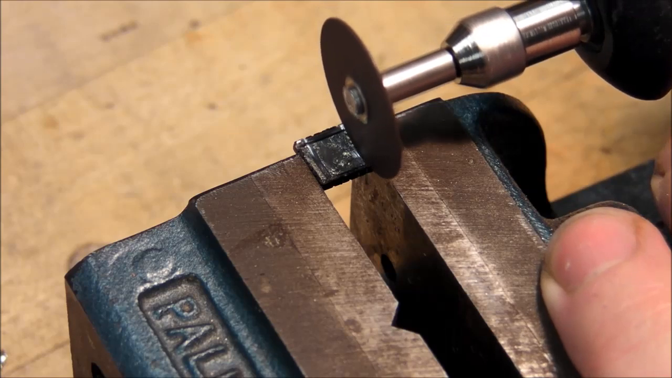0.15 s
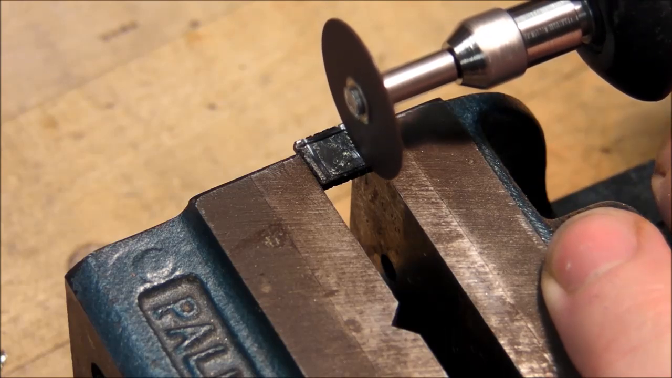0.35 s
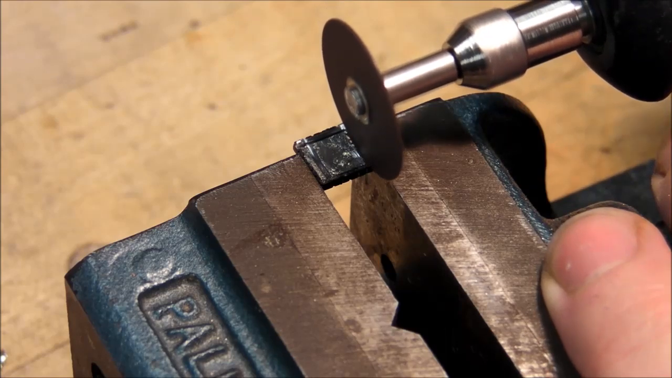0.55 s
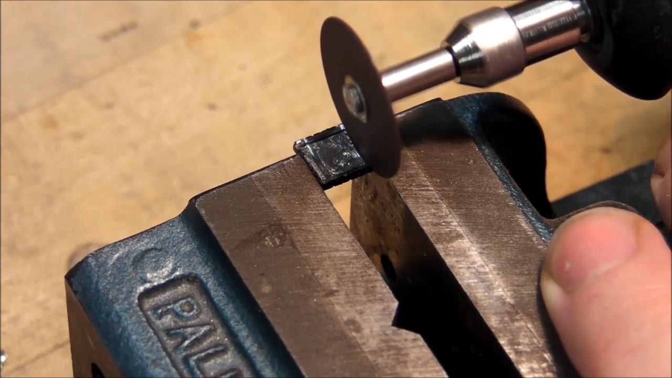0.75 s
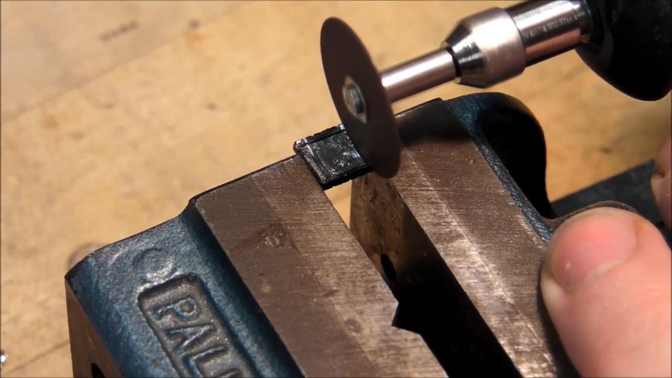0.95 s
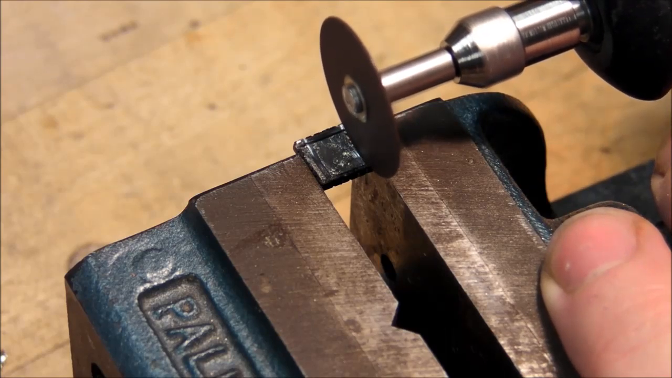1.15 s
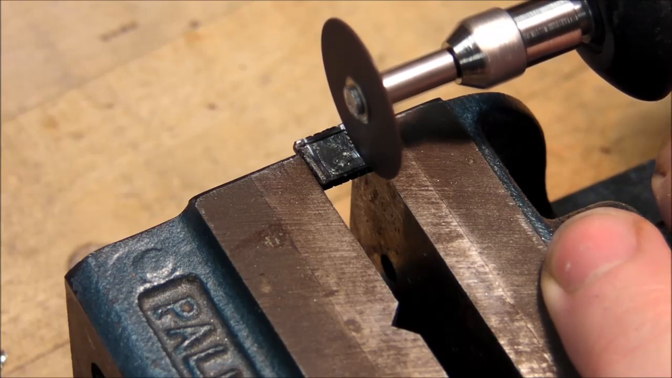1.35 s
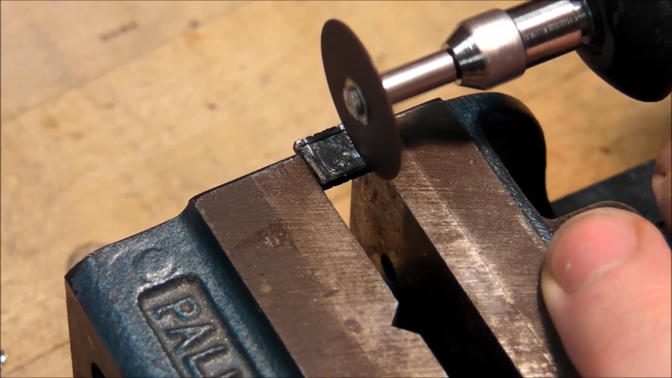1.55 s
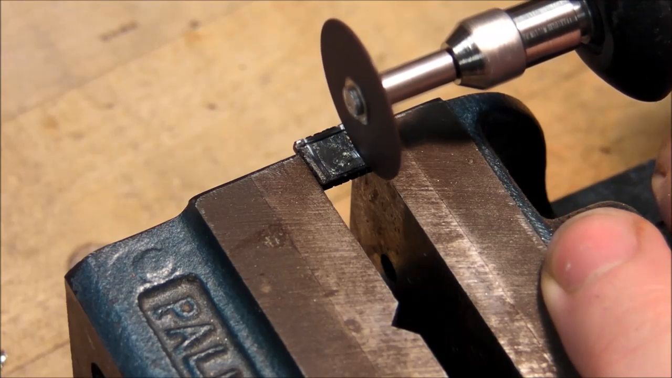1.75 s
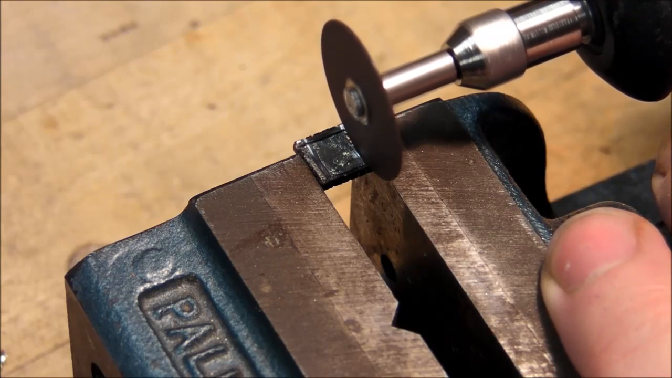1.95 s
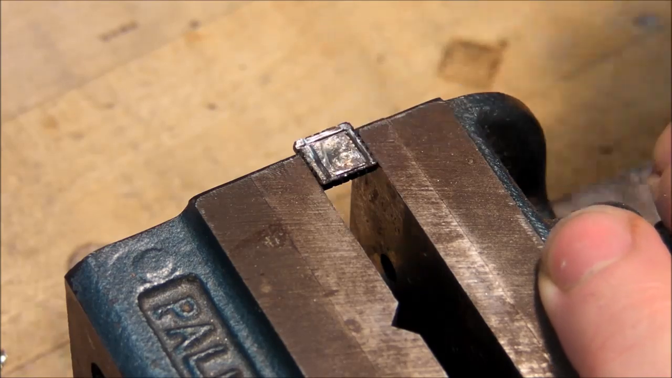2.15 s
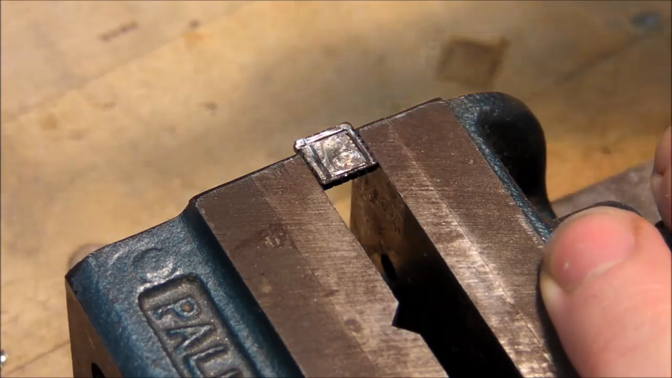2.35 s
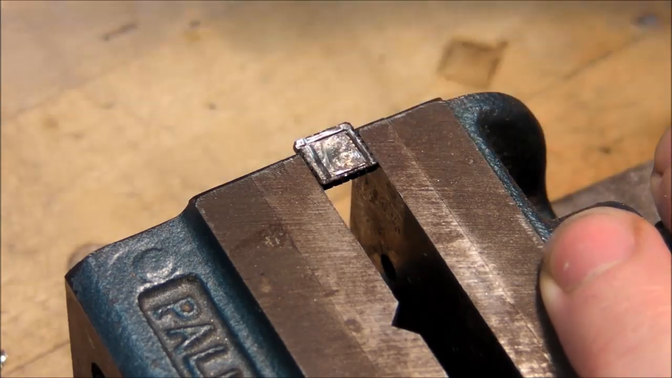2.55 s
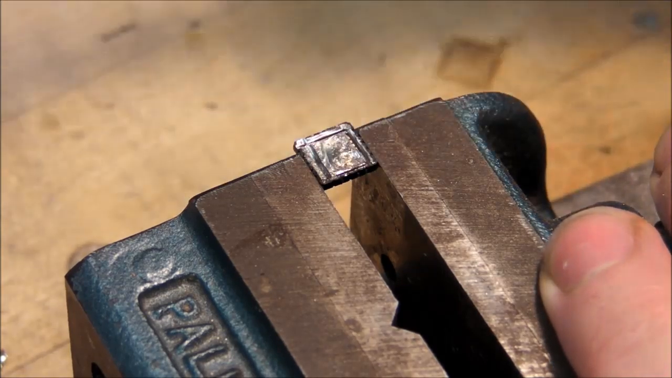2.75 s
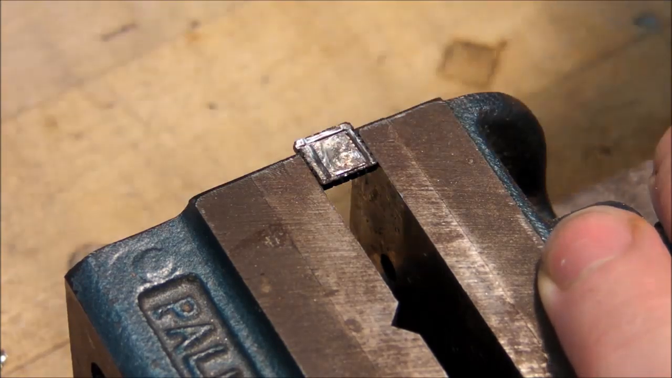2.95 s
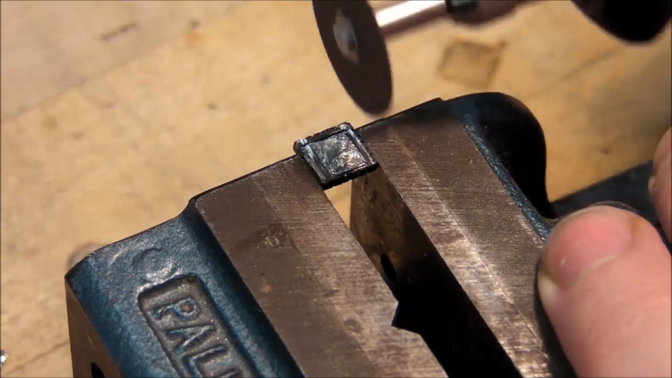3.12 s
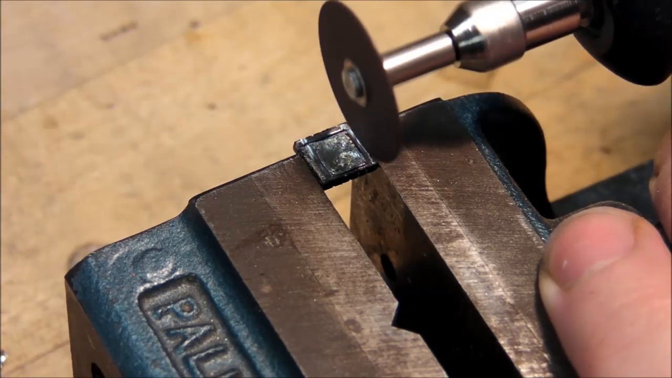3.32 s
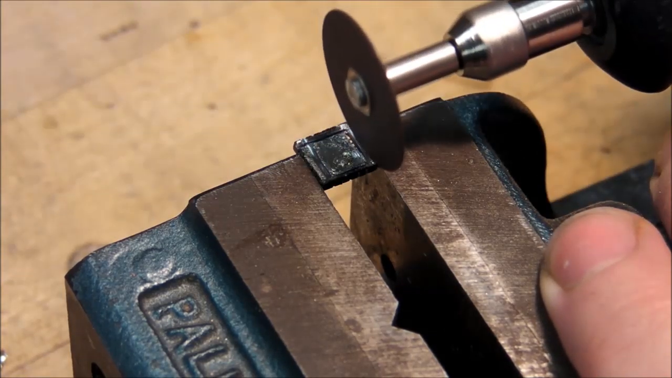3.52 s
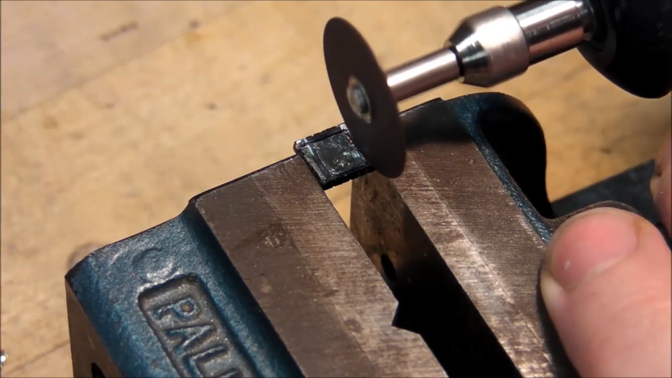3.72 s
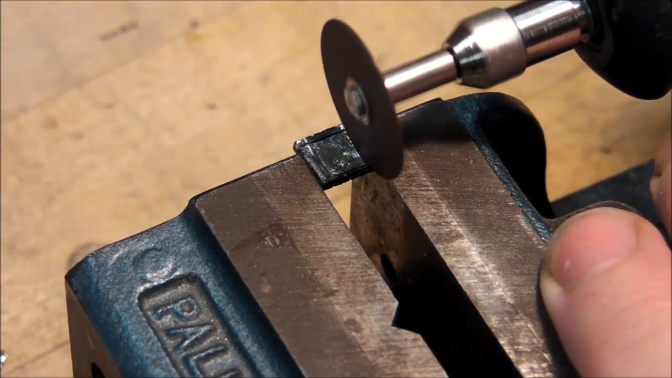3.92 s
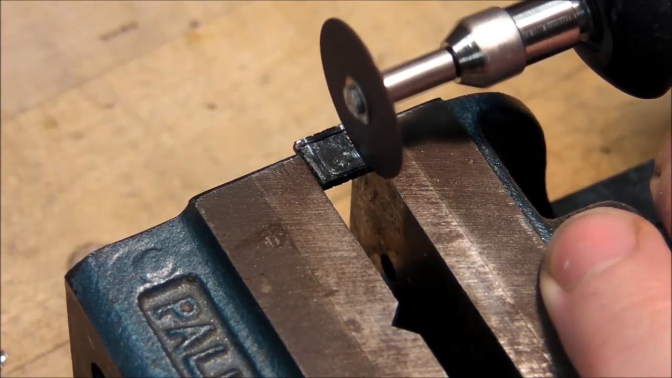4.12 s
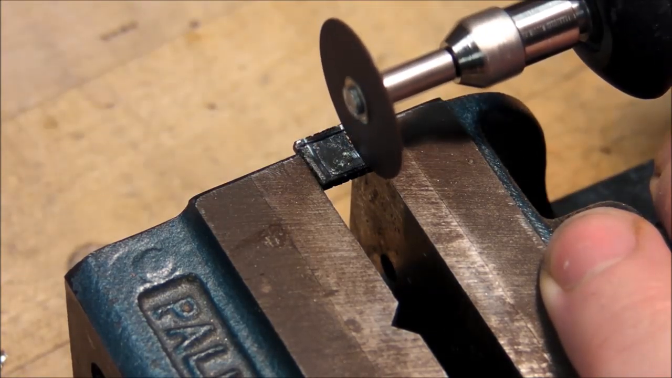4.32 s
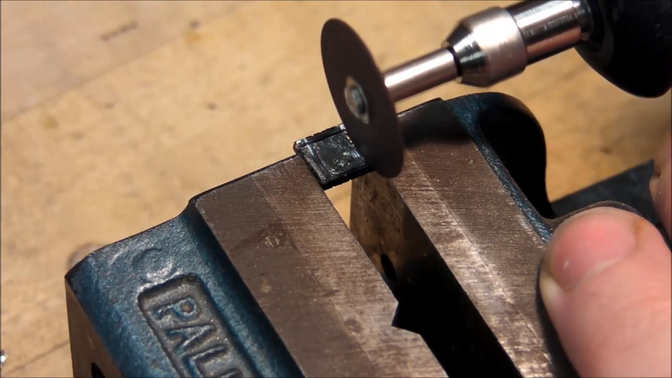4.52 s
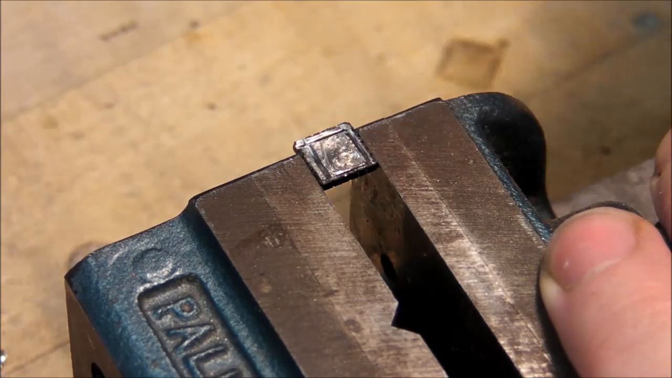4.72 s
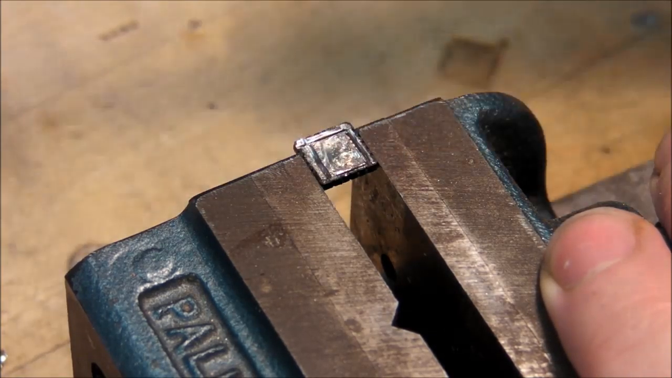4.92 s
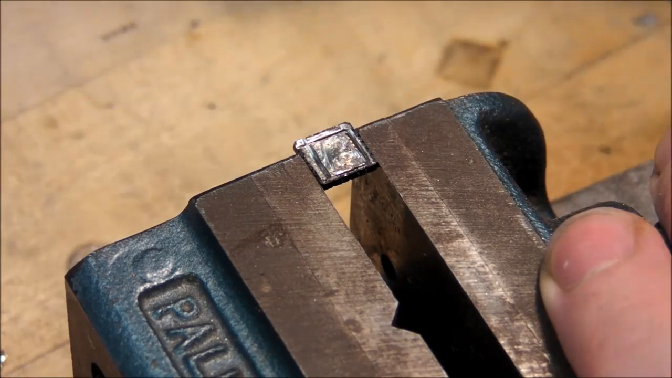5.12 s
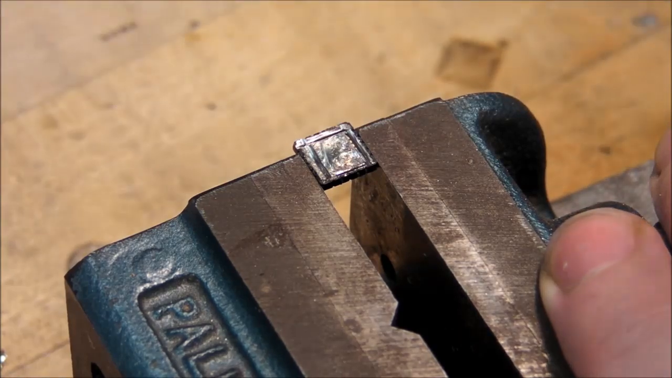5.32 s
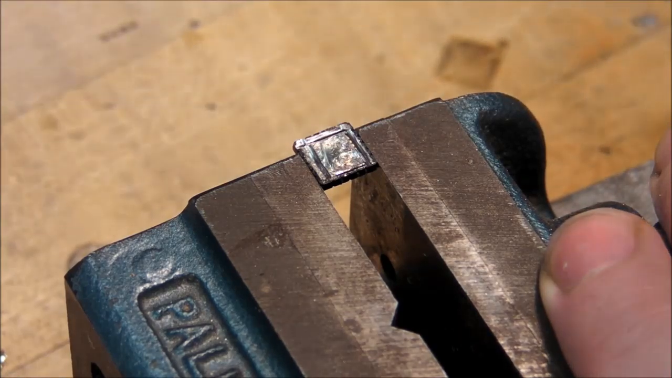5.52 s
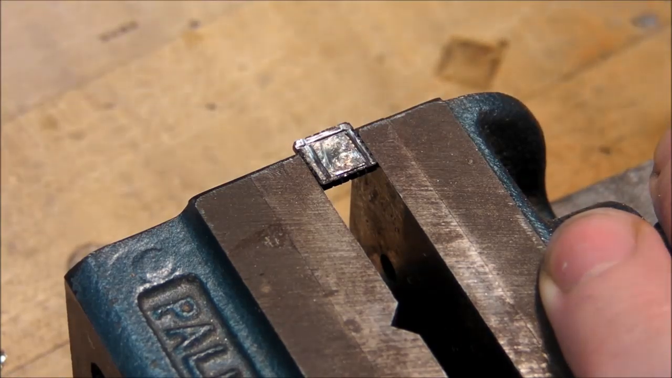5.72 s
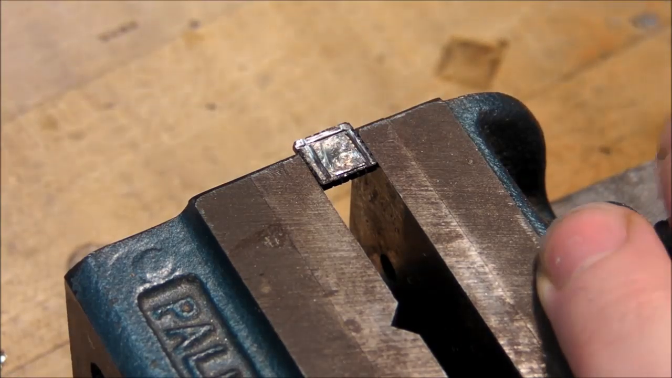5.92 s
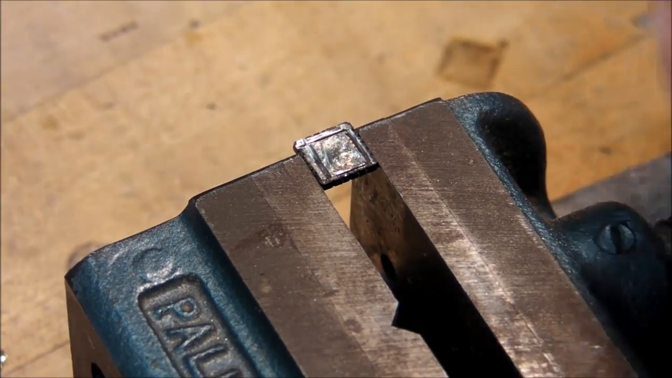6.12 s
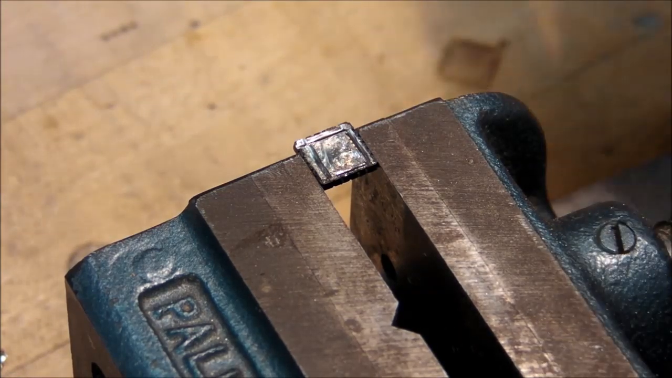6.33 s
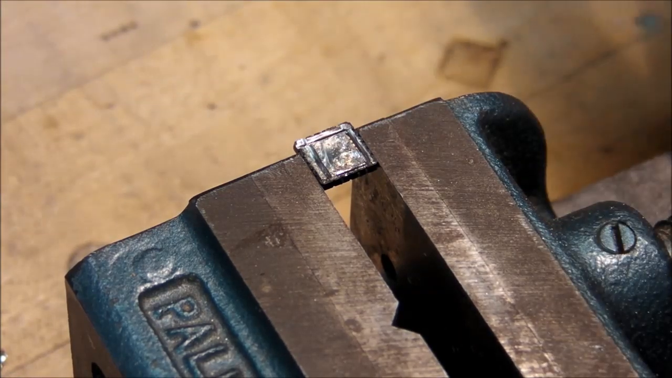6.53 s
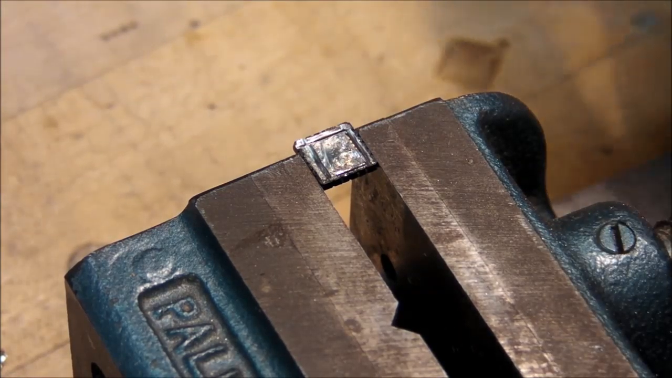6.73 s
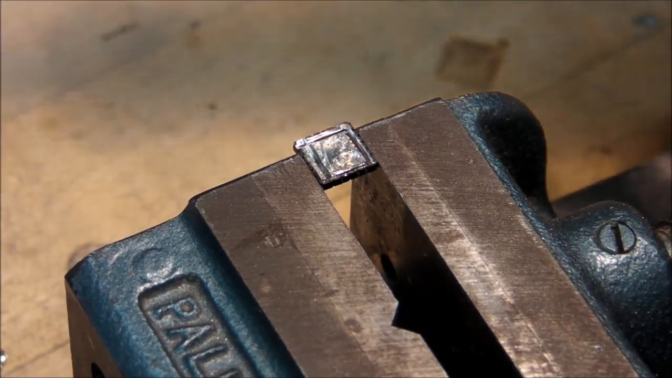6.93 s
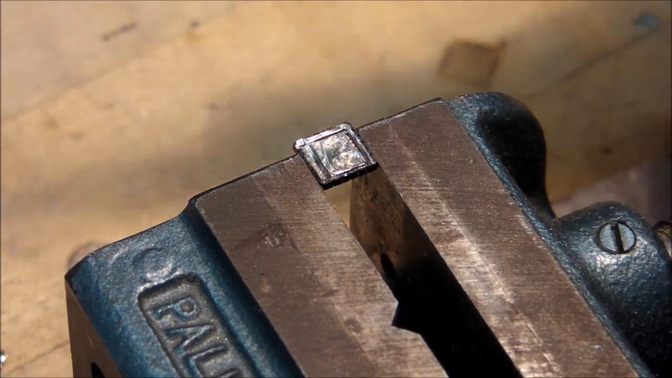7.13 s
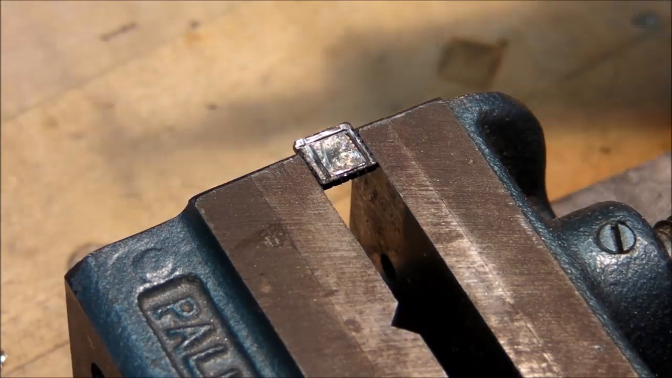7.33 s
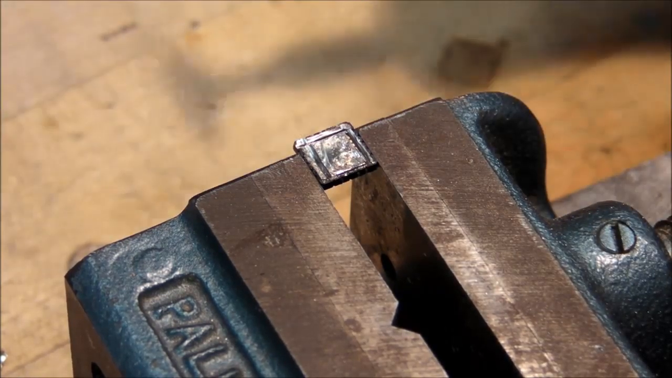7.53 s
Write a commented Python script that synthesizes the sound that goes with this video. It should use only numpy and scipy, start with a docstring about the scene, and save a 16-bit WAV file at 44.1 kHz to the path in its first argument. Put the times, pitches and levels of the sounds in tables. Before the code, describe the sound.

The sound starts mid-action, close up in a workshop with a short reflective tail. A small rotary tool whines, a dense buzzy tone with piercing whistles around 4 to 6 kHz, while its disc grinds a small part in a vise. Until about 2.1 s the grinding is rough and hissy, with harder bites near 0.3-0.8, 1.1-1.3, 1.6 and 2.0 s; the pitch sags slightly with a lag. From 2.1 to 3.9 s the disc is clear: the rasp drops and the cleaner whine climbs back. A second cut rasps from 3.9 to 4.6 s, dipping the pitch again. The tool then runs free, its tone shifting as it is lifted and turned. Faint handling rustle and soft low bumps near 6.2-6.35 s are almost buried. At 6.6 s power stops; the whine glides steadily downward, dulling and weakening, with airy bearing rattle until the end at about 7.6 s, still spinning.

```python
"""Workshop bench, close to the microphone: a small rotary tool with a cutting disc on a chip held in a vise.
The motor whines at up to 290 turns a second: a stack of orders of the shaft speed, coloured by the housing.
It sags with a lag under two cuts, where noise gated by the turning shaft rasps louder, and recovers when lifted.
Switched off, it coasts down, its bearings rattling strong and weak on alternate turns.
Behind it: reflections, room rumble, faint mains hum, rustle and soft bumps of handling."""
import sys
import numpy as np
from scipy import signal
from scipy.fft import rfft, irfft, next_fast_len
from scipy.io import wavfile
from scipy.ndimage import uniform_filter1d

SR = 44100
rng = np.random.default_rng(int(sys.argv[2]) if len(sys.argv) > 2 else 0)


def digitize_waveform(pressure):
    """Quantize a signal to 16-bit integers and store it at the path in sys.argv[1].

    Rows of a 2-D input are taken as channels; values are limited to [-1, 1].
    """
    field = np.atleast_2d(pressure).T
    bounded = np.clip(field, -1, 1)
    quanta = np.round(bounded * 32767).astype(np.int16)
    wavfile.write(sys.argv[1], SR, quanta)


N = 338247
T = np.arange(N) / SR
FRAME_S = .005
FRAMES = np.arange(0, N / SR + .01, FRAME_S)  # control times, s

# Shaft speed, in turns per s; friction is given as the speed at which air drag would equal it
FREE_HZ, LAG_S, START_SAG_HZ, OFF_S = 290.35, .71, 13.4, 6.603
DRAG_PER_S, FRICTION_HZ = .27, 403.1
RIPPLE_HZ, ROCKING_TURNS = 120, .0032  # twice the mains frequency
# Coasting, the shaft passes a speed at which it shudders
SHUDDER_HZ, SHUDDER_WIDTH_HZ, SHUDDER_DB = 238, 3, 3.2
SCATTER = .6  # of the orders' paths, free running
SECOND_ORDER_CUTOFF_HZ = 490
EDGE_HZ = 15750
BITE_EASE_S, CUT_EASE_S = .03, .02
# Tool drawn back between the cuts: start_s, end_s, move_s
PAUSE = (1.9, 3.3, 0.5)
# Tool lifted away after the work, then turned aside: start_s, end_s
LIFT, TURN = (4.65, 5.6), (5.8, 6.36)

# Disc in the cut, gains before each layer's share: start_s, end_s, hum_gain_db, rasp_gain_db
CUT_SPANS = [(-.04, 2.085, 5.5, 3.5), (3.915, 4.6, 1, 3)]
# Disc bites deeper and scrapes, gain before each layer's share: start_s, end_s, rasp_gain_db
BITE_SPANS = [(.3, .8, 0.7), (1.07, 1.33, 2.5), (1.58, 1.69, 3.5), (2.01, 2.075, 8), (4.03, 4.6, 5)]
# Pressing in each cut, as the speed the load would cost if held: time_s, load_turns_per_s
FIRST_CUT_LOAD = [(0.0, 15.5), (0.67, 17.3), (1.12, 41.3), (1.2, 48.9), (1.28, 35.1), (1.58, 28.8),
                  (1.69, 67.8), (1.91, 49.3), (2.06, 58.2)]
SECOND_CUT_LOAD = [(3.92, 5.9), (4.22, 18.5), (4.41, 39.1), (4.52, 13.0), (4.59, 27.1)]
# Housing's colour on the motor's lines, resonant near 4.1, 4.9 and 5.8 kHz: freq_hz, gain_db
HOUSING_COLOUR = [(270, -26.5), (780, -20.5), (950, 0.5), (1600, -4.5), (2300, -5.5), (2850, -18),
                  (3400, -5.5), (3850, -4.5), (4140, 3), (4500, 1), (4930, 4), (5200, 0.5), (5800, 1),
                  (7500, -12), (10300, -12), (12300, -59), (15500, -13.5)]
# Motor's lines below 3 kHz: free_db, speed_power, cut_share, load_db_per_turn_per_s, lifted_db, turned_db
HUM_LEVELS = {"first": (-62.5, 6, 0.43, 0.1281, -3.5, -0.5), "second": (-52.5, 1.5, -0.05, 0.22, 5.5, 1),
              "fourth": (-32, 1, 0.76, -0.1378, -13, 6), "fifth": (-35, 2.2, 1.67, 0, -4.5, 4.5),
              "sixth": (-34.5, 2.14, 1.72, -0.1221, -2.5, 1), "others": (-39.5, 0.5, 0.59, 0.11, -3, 4.5)}
# Treble of the orders, shifting as the tool is moved; WHINE_LEVELS adds: time_s, 3_to_5_khz_db, 5_to_7.5_khz_db
TREBLE_LEVELS = [(0.0, -19.5, -27), (0.1, -23.5, -21.5), (0.19, -18.5, -19.5), (0.63, -17.5, -23.5),
                 (1.27, -23, -17), (1.33, -25.5, -24), (1.78, -22, -18.5), (2.16, -36, -32),
                 (2.6, -29, -31.5), (2.79, -25.5, -31.5), (4.02, -24.5, -20.5), (4.89, -23.5, -30),
                 (5.08, -28, -23), (5.23, -27.5, -22.5), (6.05, -25, -23.5), (6.6, -33.5, -20),
                 (6.77, -32.5, -27.5), (7.6, -42.5, -34)]
# Offsets to the treble: free_db, db_per_rasp_db, coasting_db
WHINE_LEVELS = {"lower": (-5, -.15, -1.2), "upper": (-4.5, -0.55, -10)}
# The two whistles that ring loudest in the housing: time_s, order_16_db, order_20_db
WHISTLE_LEVELS = [(0.0, -28, -37), (0.36, -27, -37), (2.04, -37, -35), (2.64, -27.5, -40),
                  (2.76, -29, -25.5), (3.84, -29.5, -25), (4.32, -35, -38), (5.04, -27.5, -24.5),
                  (5.52, -28.5, -25), (5.76, -29, -53), (5.88, -24.5, -29.0), (6.24, -29.5, -57),
                  (6.48, -35, -29), (6.84, -42, -57), (6.96, -72, -47.0), (7.2, -82, -70)]
# Rasp of brushes, fan and disc: free_db, speed_power, cut_share, bite_share, pause_db, lifted_db, turned_db
RASP_LEVELS = {"body": (-37, 0.67, .5, 1.04, -2.5, -1.04, -2.5), "hiss": (-29.5, .7, 1, 0.87, -4, -1.3, -4),
               "fizz": (-34.5, 4, 1.18, -0.19, -1, -0.2, -4.5)}
# Relative colours of the rasp, the hiss with the power off, and the top spray: freq_hz, density_db_per_hz
BODY_COLOUR = [(150, -55), (260, -25), (370, -5), (560, -3.5), (760, -6.5), (1050, 2.5), (1600, 1.5),
               (2050, -4), (2400, 0), (2800, -9.5), (3300, -95)]
HISS_COLOUR = [(2300, -60), (2900, -19.5), (3400, -9.5), (4200, -1), (4900, 0), (5400, 1), (6300, 1.5),
               (6950, -9.5), (7500, -13), (8300, -47)]
COASTING_COLOUR = [(2600, -43), (3000, 9), (3400, -11), (4400, 5), (5200, -2), (6200, 12.5), (7100, 12.5),
                   (7900, 2), (8800, -6.5)]
FIZZ_COLOUR = [(6700, -27), (7500, 3), (8600, 4), (9500, 1), (10100, 3), (10900, 4.5), (11900, -4),
               (14000, -8), (15600, -16.5)]
SPRAY_COLOUR = [(11000, -30), (12500, 21), (14000, 20), (15600, -5)]
# Relative colour of the room rumble: freq_hz, density_db_per_hz
ROOM_COLOUR = [(15, -6), (55, 5.5), (130, 7.5), (240, 4), (600, -52), (4000, -64)]
# Soft bumps on the bench as the hand lets go of the vise: time_s, level_db, pitch_hz
BENCH_BUMPS = [(6.2, -50, 50), (6.35, -51, 60)]


def motor(turns, cut_scatter=0.97, fourth_db=2, rattle=0.049, spread_s=0.00063):
    """One knock a turn makes a stack of orders; reflections round the moving hand shift each of them."""
    order = np.arange(1, 61)[:, None]
    hz = order * speed(FRAMES)
    short_wave = np.minimum(hz / 4000, 1)  # long waves are less affected
    scatter = SCATTER + cut_scatter * contact(FRAMES)
    paths = 1 + short_wave * scatter * drift(2.9, count=len(order))
    # the housing spreads each knock in time: the middle of its range rings longest
    lag = np.exp(-2j * np.pi * spread_s * 1000 * np.tanh((hz - 5000) / 1000))
    # under power the low orders peak at unrelated angles
    powered = 1 - coasting(FRAMES, .6)
    lag = lag * np.exp(1j * np.pi * rng.uniform(-1, 1, order.shape) * (order < 11) * powered)
    # every fourth order stands out, as from a four-fold rotor
    lines = colour(HOUSING_COLOUR, hz) * paths * lag * amp(fourth_db * (order % 4 == 0))

    # split into four ranges, each held at its own level
    lower_db, upper_db = curves(TREBLE_LEVELS, FRAMES)
    levels_db = [hum_db("others") + shudder_db(FRAMES),
                 whine_db("lower", lower_db),
                 whine_db("upper", upper_db),
                 rasp_db("fizz")]
    above = [1] + [np.clip((hz - edge_hz) / 300 + .5, 0, 1) for edge_hz in (2900, 5100, 7500)] + [0]
    singing = np.array([1, 2, 4, 5, 6, 16, 20])
    gains = 0
    for k, db in enumerate(levels_db):
        part = lines * ~np.isin(order, singing) * (above[k] - above[k + 1])
        power = (abs(part) ** 2).sum(0)
        gains = gains + amp(db + 0.47 * coasting(FRAMES, 0.37)) * part / np.sqrt(power + 1e-4)

    # seven orders sing steadily; the low ones die as they sink below the housing's range
    low_db = [hum_db(name) for name in ("first", "second", "fourth", "fifth", "sixth")]
    steady = amp(low_db + curves(WHISTLE_LEVELS, FRAMES))
    gains[singing - 1] = steady * lag[singing - 1]
    # the small housing hardly radiates the second order once it is deep
    gains[1] *= np.minimum(hz[1] / SECOND_ORDER_CUTOFF_HZ, 1) ** 7
    gains[3:6] *= colour(HOUSING_COLOUR, hz[3:6])

    step, spin, stack = np.exp(2j * np.pi * turns), 1, 0
    for gain in gains:
        spin = spin * step  # next order's phasor
        stack = stack + np.sqrt(2) * (np.interp(T, FRAMES, gain) * spin).real
    # without drive the shaft rattles in its bearings, strong and weak on alternate turns
    return stack * (1 + rattle * coasting(T, 0.15) * np.cos(np.pi * turns))


def speed(t):
    """Turns per s: the rotor follows its load with a lag; switched off, air drag and dry friction slow it."""
    keep = np.exp(-FRAME_S / LAG_S)
    sag = signal.lfilter([1 - keep], [1, -keep], load(FRAMES), zi=[keep * START_SAG_HZ])[0]
    driven = FREE_HZ - np.interp(np.minimum(t, OFF_S), FRAMES, sag)
    decay = np.exp(-DRAG_PER_S * np.maximum(t - OFF_S, 0))
    return (driven + FRICTION_HZ) * decay - FRICTION_HZ


def load(t):
    """Braking of the disc in the cuts, in turns per s."""
    presses = (FIRST_CUT_LOAD, SECOND_CUT_LOAD)
    return sum(np.interp(t, *np.transpose(press), left=0, right=0) for press in presses)


def ripple():
    """The speed control feeds the motor in bursts, twice a mains cycle, until the switch-off."""
    phase = 2 * np.pi * RIPPLE_HZ * T
    return (1 - coasting(T, .02)) * (np.cos(phase) + 0.09 * np.cos(2 * phase))


def hum_db(name):
    """Level of a low line: in the cut the shaft also shakes the vise."""
    free_db, power, cut_share, per_load, lifted_db, turned_db = HUM_LEVELS[name]
    cut_db = cut_share * gains_in(CUT_SPANS, FRAMES)[0]
    return running_db(free_db, power, lifted_db, turned_db) + cut_db + per_load * load(FRAMES)


def whine_db(name, treble_db, fade_s=0.6, pause_db=1.2):
    """Level of a whine range: clean lines give way to rasp in the cut, and fade with the power off."""
    free_db, per_rasp, coast_db = WHINE_LEVELS[name]
    grinding_db = gains_in(CUT_SPANS, FRAMES)[1] + gains_in(BITE_SPANS, FRAMES, BITE_EASE_S)[0]
    moved_db = treble_db + free_db + pause_db * within(FRAMES, *PAUSE)
    return moved_db + per_rasp * grinding_db + coast_db * coasting(FRAMES, fade_s)


def shudder_db(t):
    """Swells while the falling speed crosses the shaft's resonance."""
    return SHUDDER_DB * np.exp(-((speed(t) - SHUDDER_HZ) / SHUDDER_WIDTH_HZ) ** 2)


def rasp(turns, free_gate=0.04, cut_gate=0.094, coast_gate=0.17, uneven_db=-1.0, cut_uneven_db=1.6, grit_db=1):
    """Rubbing noise swells once a turn; in the cut each turn bites differently and single grits tear out."""
    cut, coast = contact(T), coasting(T, 0.9)
    depth = free_gate + (cut_gate - free_gate) * cut + (coast_gate - free_gate) * coast
    gate = 1 + np.clip(depth, 0, 1) * np.cos(2 * np.pi * turns)
    grits = np.repeat(rng.standard_normal(N // 24 + 1), 24)[:N]  # held 24 samples each
    uneven = (uneven_db + cut_uneven_db * cut) * per_turn(turns)
    force = gate * amp(uneven + grit_db * cut * grits)
    force = force / np.sqrt(uniform_filter1d(force ** 2, size=3000))

    noise_a, noise_b, noise_c = rng.standard_normal((3, N))
    body_db, hiss_db, fizz_db = (np.interp(T, FRAMES, rasp_db(name)) for name in ("body", "hiss", "fizz"))
    body = shaped(noise_a * force ** 0.29, BODY_COLOUR) * amp(-2 * coast + 0.28 * shudder_db(T))
    # crossfade to the coasting colour
    hiss = np.sqrt(1 - coast) * shaped(noise_b * force, HISS_COLOUR)
    hiss = hiss + np.sqrt(coast) * shaped(noise_c * force, COASTING_COLOUR)
    fizz = shaped(noise_a * force ** 0.94, FIZZ_COLOUR) * flicker(2.9, 6.8)
    # the highest part beams in changing directions
    fizz = fizz + amp(-13 - 9.1 * cut) * shaped(noise_c * force, SPRAY_COLOUR) * flicker(1.1, 4)
    hiss = hiss * flicker(0.83, 24)
    return amp(body_db) * body + amp(hiss_db + 1.0 - 0.59 * coast) * hiss + amp(fizz_db - 1) * fizz


def rasp_db(name):
    """Level of a rasp range: louder in the cut, shifted in a bite, fainter with the tool drawn back."""
    free_db, power, cut_share, bite_share, pause_db, lifted_db, turned_db = RASP_LEVELS[name]
    cut_db = cut_share * gains_in(CUT_SPANS, FRAMES)[1]
    bite_db = bite_share * gains_in(BITE_SPANS, FRAMES, BITE_EASE_S)[0]
    free_running_db = running_db(free_db, power, lifted_db, turned_db)
    return free_running_db + cut_db + bite_db + pause_db * within(FRAMES, *PAUSE)


def running_db(free_db, power, lifted_db, turned_db):
    """Level out of the cut: follows a power of the speed and changes as the tool is moved off."""
    pace_db = 20 * np.log10(speed(FRAMES) / FREE_HZ)
    return free_db + power * pace_db + lifted_db * ramp(FRAMES, *LIFT) + turned_db * ramp(FRAMES, *TURN)


def per_turn(turns):
    """A new random value for each turn of the shaft, joined by straight lines."""
    return np.interp(turns, np.arange(3000), rng.standard_normal(3000))


def flicker(depth_db, rate_hz):
    """A gain that wavers as the rubbing pressure changes."""
    return amp(depth_db * np.interp(T, FRAMES, drift(rate_hz)[0].real))


def contact(t):
    """1 while the disc grinds, 0 while it runs free."""
    return sum(within(t, start_s, end_s) for start_s, end_s, *_ in CUT_SPANS)


def coasting(t, ease_s):
    """Rises from 0 to 1 after the switch-off."""
    return ramp(t, OFF_S, OFF_S + ease_s)


def workshop(x, t60_s=0.49, wet_db=-12):
    """A short tail of sparse reflections, which smears the falling lines."""
    t = np.arange(SR // 2) / SR
    sparse = rng.standard_normal(len(t)) * (rng.random(len(t)) < .05)
    taps = sparse * amp(-60 * t / t60_s) * (t > .004)
    return x + amp(wet_db) * signal.fftconvolve(x, taps / np.linalg.norm(taps))[:N]


def background(air_db=-65, mains_db=-73, handling_db=-64):
    """Shaped-noise room rumble and handling rustle, a mains sine, and decaying sines for bench bumps."""
    out = amp(air_db) * shaped(rng.standard_normal(N), ROOM_COLOUR)
    handling = np.interp(T, [5.6, 6, 6.4, 7.6], [0.21, 1, 0.76, 0.58])
    rustle = shaped(rng.standard_normal(N), [(45, -14), (90, -8), (150, -10)])
    out += amp(handling_db) * handling * rustle
    out += amp(mains_db) * np.sqrt(2) * np.sin(2 * np.pi * RIPPLE_HZ * T)
    for start_s, level_db, pitch_hz in BENCH_BUMPS:
        u = np.maximum(T - start_s, 0)
        swell = u / .012 * np.exp(1 - u / 0.011)
        out += amp(level_db) * swell * np.sin(2 * np.pi * pitch_hz * u)
    return out


def amp(db):
    """Decibels to amplitude."""
    return 10 ** (np.asarray(db) / 20)


def evened(x):
    """x at unit RMS."""
    return x / np.sqrt(np.mean(x ** 2) + 1e-20)


def curves(table, t):
    """The columns of a table at the times t."""
    time_s, *columns = np.transpose(table)
    return [np.interp(t, time_s, column) for column in columns]


def colour(points, hz):
    """Gain of a spectrum at the frequencies hz."""
    freq_hz, db = np.transpose(points)
    return amp(np.interp(np.log(hz + 1), np.log(freq_hz), db))


def shaped(x, points):
    """x through a spectrum whose skirts fall away, at unit RMS."""
    size = next_fast_len(N)
    hz = np.fft.rfftfreq(size, 1 / SR)
    skirts = np.minimum(hz / points[0][0], 1) ** 2 / np.maximum(hz / points[-1][0], 1) ** 2
    return evened(irfft(rfft(x, size) * colour(points, hz) * skirts, size)[:N])


def drift(rate_hz, count=1):
    """Slow complex random rows at frame rate, low-passed, at unit RMS overall."""
    hz = np.fft.fftfreq(len(FRAMES), FRAME_S)
    a, b = rng.standard_normal((2, count, len(hz)))
    z = np.fft.ifft((a + 1j * b) / (1 + (hz / rate_hz) ** 2))
    return z / np.sqrt(np.mean(abs(z) ** 2))


def ramp(t, start_s, end_s):
    """Rises from 0 to 1 between two times."""
    return np.clip((t - start_s) / (end_s - start_s), 0, 1)


def within(t, start_s, end_s, ease_s=CUT_EASE_S):
    """1 between two times, with sloping flanks."""
    return np.clip(np.minimum(t - start_s, end_s - t) / ease_s, 0, 1)


def gains_in(rows, t, ease_s=CUT_EASE_S):
    """The dB columns of a table of spans at the times t; 0 outside the spans."""
    return sum(np.outer(db, within(t, start_s, end_s, ease_s)) for start_s, end_s, *db in rows)


def scene(flutter=0.00052, loose_turns=0.0008):
    """The tool stands straight ahead, so both channels hear nearly the same."""
    waver = np.interp(T, FRAMES, drift(15.56)[0].real)
    turns = np.cumsum(speed(T) * (1 + flutter * (1 + contact(T)) * waver)) / SR
    # bursts of drive rock the shaft, giving sidebands; coasting, its knocks fall loosely in time
    turns = turns + ROCKING_TURNS * ripple() + loose_turns * coasting(T, 0.23) * per_turn(turns)
    tool = motor(turns) + rasp(turns)
    mid = workshop(tool) + background()
    side = amp(-38) * (workshop(tool) - tool) + amp(-23) * background()
    return np.array([mid + side, mid - side])


def record(dry):
    """The band limit of the recorder: a linear-phase low-pass."""
    low_pass = signal.firwin(511, EDGE_HZ, window=("kaiser", 9), fs=SR)
    return signal.oaconvolve(dry, low_pass[None], "same")


dry = scene()
out = record(dry)
digitize_waveform(out)
```